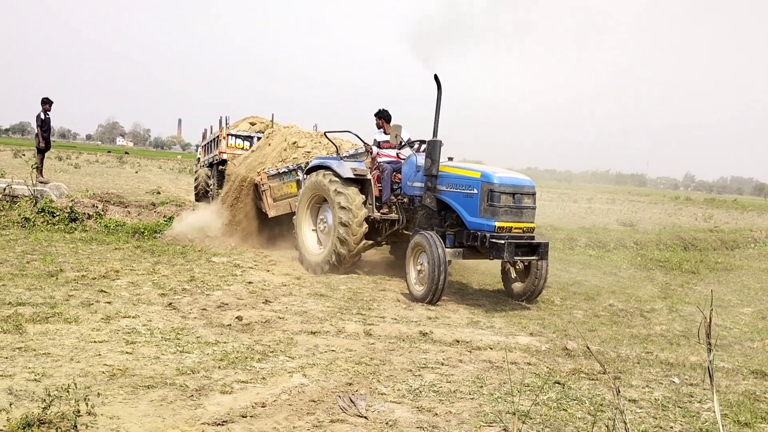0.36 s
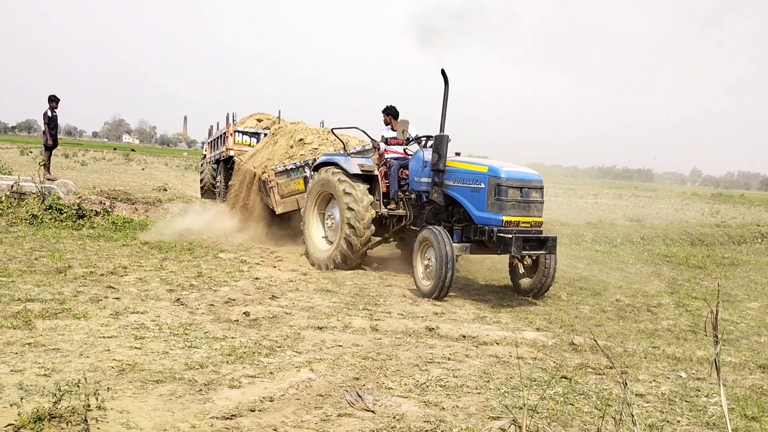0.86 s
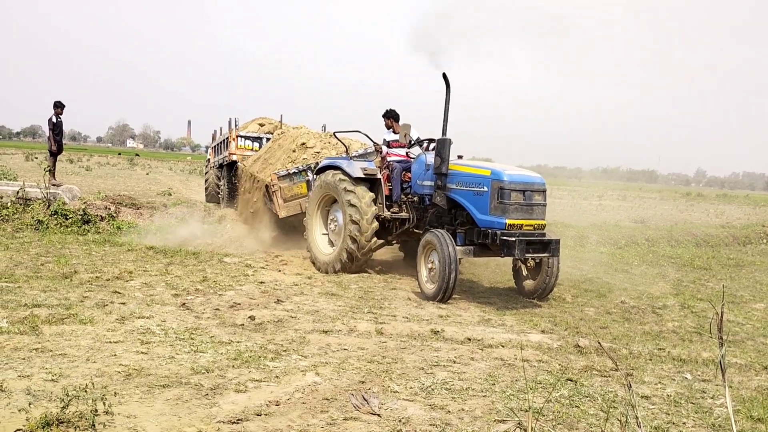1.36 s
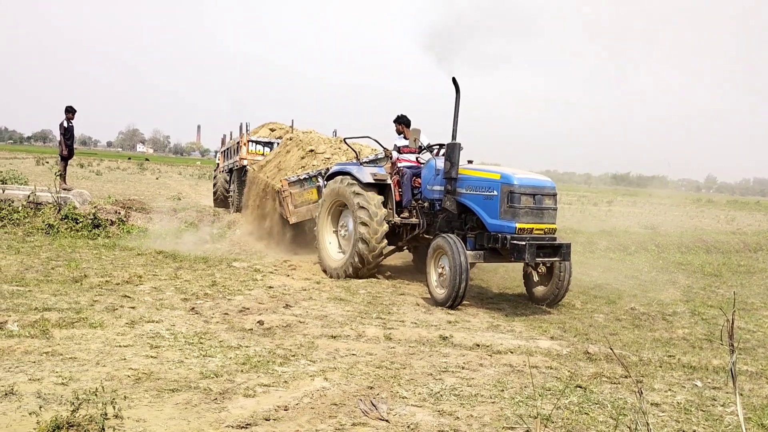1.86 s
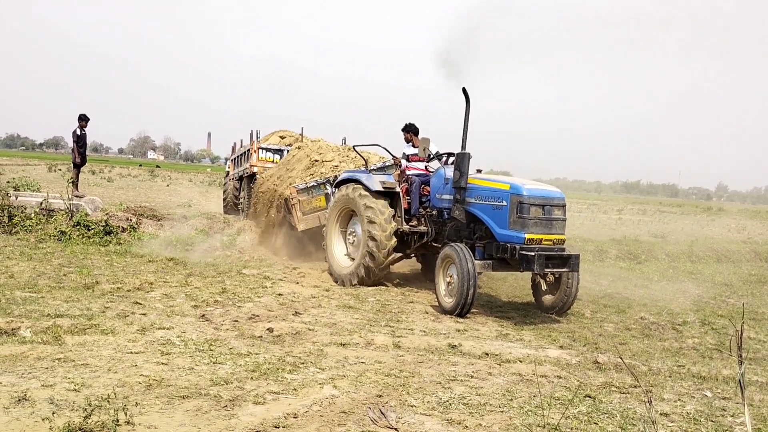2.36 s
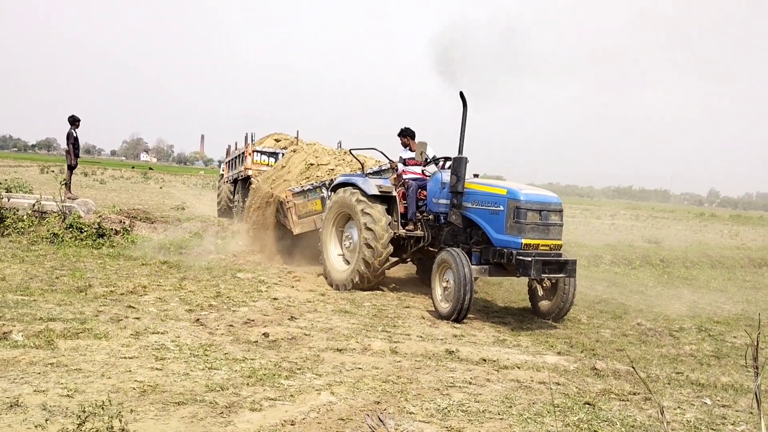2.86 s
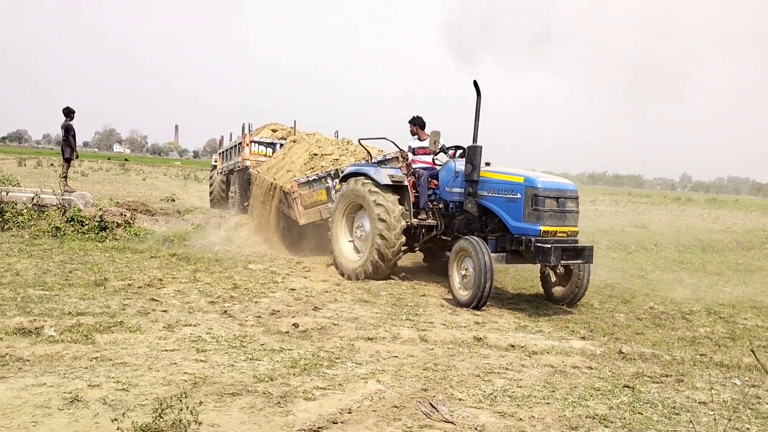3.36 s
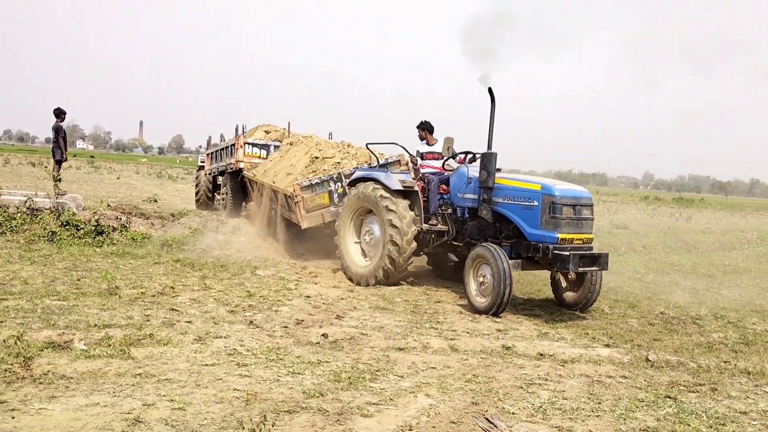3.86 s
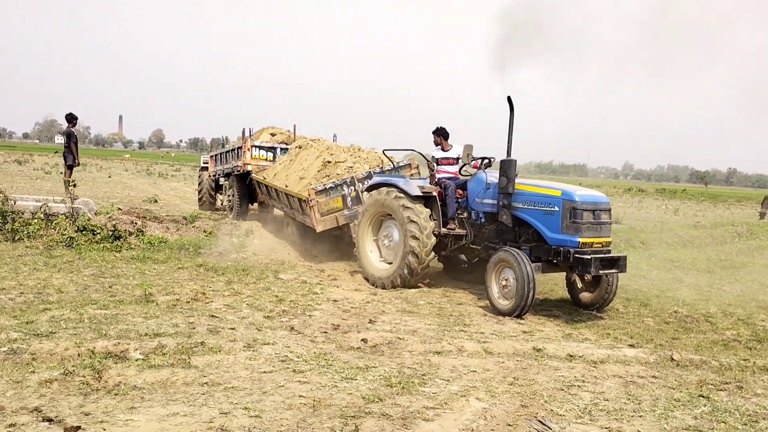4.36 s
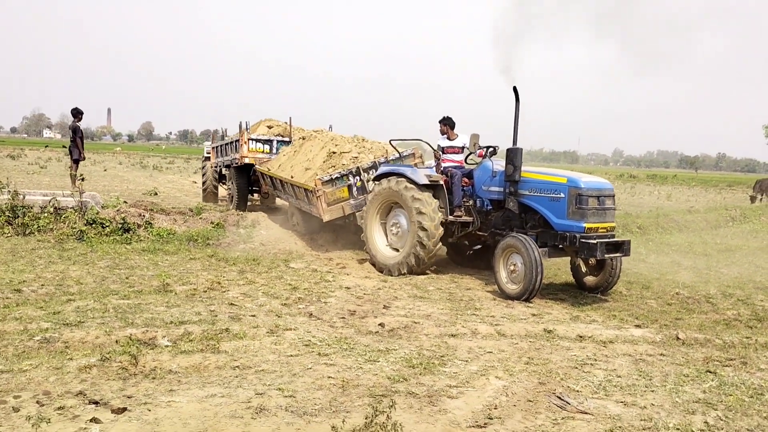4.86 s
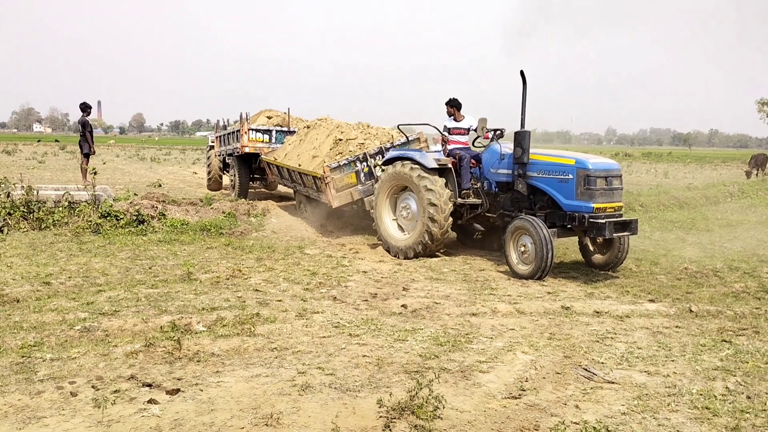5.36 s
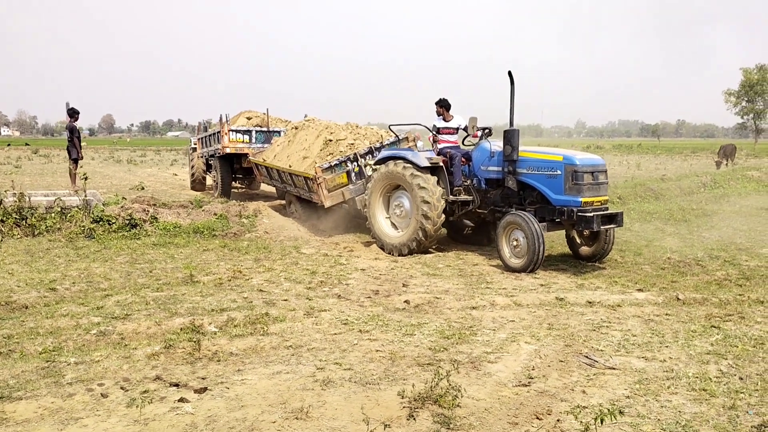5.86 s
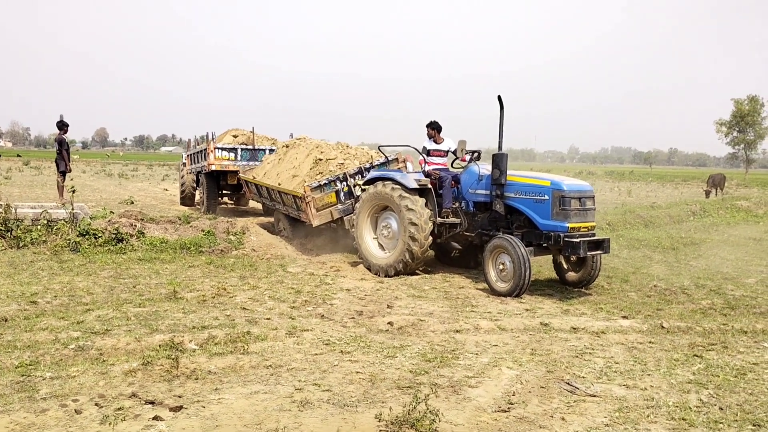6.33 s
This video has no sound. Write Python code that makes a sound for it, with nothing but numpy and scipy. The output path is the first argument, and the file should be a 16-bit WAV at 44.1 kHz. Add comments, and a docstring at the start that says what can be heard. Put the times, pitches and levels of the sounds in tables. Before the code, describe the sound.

From 0 s a three-cylinder diesel tractor is already straining at full effort, a few metres from a small phone microphone in an open field. About 45 rapid firings a second fuse into rough chugging: low exhaust thumps, a surging muffler growl, bright spitting stack hiss and hard ringing block clatter. Tyres rumble in soil and a low driveline drone wavers in spells. The pace sags after 0.8 s and again near 2 s; the trailer bed bumps at 1.7 s. Around 3 s the engine eases, quieter and more distinctly pulsed, with sheet metal ringing. From 4 to 5.2 s gears grind, with hard metallic knocks and hitch creaks, a sharp one at 4.45 s, as the pace rises slightly. At 5.3 s the throttle shuts: hiss collapses and the engine slows with faint rattle, dull low thuds and thin creaks until 6.5 s.

```python
"""A three-cylinder diesel tractor strains against a loaded trailer in a field, some metres from a phone.
From the start each firing thumps in the exhaust, growls in the muffler, spits stack hiss and rings the block;
tyres rumble, a driveline tone drones in spells and the trailer bed bumps. At 3 s the engine eases and sheet metal
rings with the knocks; from about 4 s noisy gears grind, single case modes are struck and the hitch creaks.
At 5.3 s the throttle shuts: the engine coasts down with a faint block rattle, low thuds and more creaks."""
import sys
import numpy as np
from scipy import signal
from scipy.fft import rfft, irfft, next_fast_len
from scipy.io import wavfile
from scipy.ndimage import uniform_filter1d, map_coordinates

SR = 44100
rng = np.random.default_rng(int(sys.argv[2]) if len(sys.argv) > 2 else 0)


def dump(signal):
    """Clip the signal to [-1, 1] and save it as 16-bit WAV at the path in sys.argv[1]."""
    limited = np.clip(np.atleast_2d(signal).T, -1, 1)
    pcm = np.round(limited * 32767).astype(np.int16)
    wavfile.write(sys.argv[1], SR, pcm)


def gain_from_db(level_db):
    """Turn a decibel level (scalar or array-like) into a linear amplitude factor."""
    decades = np.asarray(level_db, float) / 20
    return 10 ** decades


N = 285327
TIME = np.arange(N) / SR

# engine speed: t/s, firing rate/Hz
FIRING_RATE = [(0.0, 44.5), (0.3, 45.07), (0.8, 43.7), (1.0, 40.13), (1.5, 41.97), (1.75, 40.92),
               (2.2, 36.14), (2.5, 37.07), (2.8, 35.87), (3.95, 34.96), (4.2, 36.15), (5.05, 37.47),
               (5.3, 39.93), (5.45, 38.72), (6.1, 29.22), (6.47, 26.88)]
# per cylinder, before random scatter: hiss level/dB, ring level/dB, thump level/dB
CYLINDERS = [(0, -12.5, 5.5), (1.5, -12.5, 4.5), (2.2, -12.5, 6)]
# load on the engine, as stack hiss: t/s, level/dB
LOAD = [(0, -33.5), (1, -35), (2, -35), (2.35, -36.5), (2.98, -36), (3.2, -42.5), (3.75, -44.5), (4, -41.5),
        (4.6, -45.5), (5, -44), (5.275, -44.5), (5.3, -62), (5.85, -62), (6.1, -64.5), (6.47, -68.5)]
# stage of the pull: t/s, stage (0 straining, 1 eased, 2 throttle shut)
STAGE = [(0, 0), (2.95, 0), (3.2, 1), (5.28, 1), (5.31, 2), (6.47, 2)]
# per stage: mean hiss level/dB, ring level/dB, thump level/dB, pulsed share (0-1), top-treble hiss level/dB
STAGE_SETTINGS = [(-35, -36.5, -44, 0.73, -2), (-38, -45.5, -51, 0.88, -1), (-63.5, -51, -58.5, 0.46, 1)]
# per stage: slope of ring level against load (dB/dB)
RING_PER_LOAD = [1.77, 0.077, 0.42]
# stack hiss spectrum: f/Hz, density level/dB per Hz
STACK = [(2060, -12.5), (3500, -16), (3900, -7.5), (5350, -0.5), (6300, -9), (8280, -4.5), (8820, -7),
         (9940, -13), (12700, -11), (15100, -23), (15900, -19)]
# block and bonnet resonances, one list per stage: f/Hz, width/Hz, level/dB
BLOCK = [
    [(738, 232, -2.5), (1142, 205, 0), (1374, 170, -5.5), (1768, 270, 1.5), (2370, 320, -1.5),
     (3056, 203, -1.5), (3563, 220, -7)],
    [(826, 1610, 9.5), (1205, 300, 16), (1620, 480, 11.5), (2620, 1370, 11.5), (3320, 2740, 10.5)],
    [(473, 230, -4), (1124, 70, 1), (1350, 79, 6), (1360, 2370, -3.5), (2480, 6000, -18), (8040, 2700, -15)],
]
# exhaust pipe resonances: f/Hz, width/Hz, level/dB
PIPE = [(73.6, 12, 1.5), (114.5, 19.7, 6), (217.4, 28, -2), (289, 48, -13.5)]
# exhaust growl, 3 dB above the level used: t/s, level/dB
GROWL = [(0.0, -42), (0.21, -37.5), (0.29, -46), (0.77, -39), (1.26, -43), (1.31, -63), (1.41, -38),
         (1.66, -52), (1.75, -36.5), (2.36, -45), (2.5, -33), (2.61, -46), (2.77, -37), (3.17, -46.5),
         (4.34, -52), (5.46, -50.5), (5.78, -62.5), (6.47, -57.5)]
# muffler resonances: f/Hz, width/Hz, level/dB
MUFFLER = [(160, 71, 1), (212, 50, 2.5), (283.2, 59, -0.5), (343, 34, -11)]
# tyres and chassis: t/s, level/dB
SOIL = [(0, -48), (.8, -39.5), (1.4, -53), (1.75, -42), (2.2, -47), (3.08, -45.5), (3.3, -43.5), (4.6, -53),
        (5.28, -51), (5.35, -52.5), (5.6, -55.5), (6.47, -59.5)]
# tyre and chassis spectrum: f/Hz, density level/dB per Hz
RUMBLE = [(15, -56), (25, -62), (85, -9.5), (112, 4.5), (150, 4), (195, -3), (279, -6), (325, -11),
          (479, -16.5), (900, -11), (1170, -63), (1980, -120)]
# air on the microphone ports: f/Hz, density level/dB per Hz
BREEZE = [(15, -6), (30, -6), (60, 2), (120, -21), (300, -60)]
# driveline drone pitch, before a random waver: t/s, f/Hz
DRONE = [(0, 126), (0.549, 115.3), (.8, 111.1), (1.049, 121), (1.23, 137.2), (1.652, 113.9), (1.93, 107.5),
         (2.3, 114.4), (2.581, 109), (2.8, 103.6), (3.171, 103.6), (3.6, 105.6), (3.85, 115.6)]
# spells of drone: start t/s, end t/s, multiple of the pitch, level/dB
HUMS = [(0.01, 0.108, 1, -32.5), (0.546, 0.96, 1, -37), (1.013, 1.215, 1, -33), (1.657, 1.943, 1, -40.5),
        (2.346, 2.562, 1, -36), (2.736, 2.904, 2, -48.5), (2.967, 3.07, 1, -38.5), (3.288, 3.452, 1, -42.5),
        (3.553, 3.863, 1, -47.5)]
# trailer bumps: t/s, level/dB, decay/s
JOLTS = [(1.72, -34, 0.0071), (1.733, -38, 0.042), (5.32, -63, 0.052)]
# trailer bed resonances: f/Hz, width/Hz, level/dB
TRAILER = [(256, 150, 12), (655, 590, 9), (1250, 370, -10)]
# sheet metal modes: f/Hz, width/Hz
PANELS = [(1730, 110), (2186, 120), (2780, 190), (3030, 200), (3330, 120), (3715, 170), (4760, 650),
          (5570, 480), (8000, 1500), (1533, 100), (2050, 85), (807, 120), (1166, 95)]
# clearest panel ringing: start t/s, end t/s, row of PANELS from 0, level/dB
SPELLS = [(3.276, 3.554, 4, -55), (3.49, 3.54, 11, -52), (3.63, 3.69, 4, -47), (3.66, 3.867, 10, -56.5),
          (3.796, 3.912, 12, -52), (3.25, 3.55, 6, -51), (3.352, 3.66, 5, -54), (3.923, 4.17, 8, -51),
          (4.09, 4.37, 4, -55), (4.31, 4.433, 1, -54.5), (4.93, 5.168, 7, -47), (5.1, 5.294, 1, -52)]
# gears under strain, low then high: start t/s, end t/s, level/dB, fade/s
GRIND = [(4.09, 4.92, -46, 0.3), (4.03, 5.25, -46.5, 0.06)]
# gear case resonances, low list then high: f/Hz, width/Hz, level/dB
GEARS = [
    [(418, 150, -7), (533, 92, 2)],
    [(726, 400, -5.5), (960, 145, 11.5), (1103, 160, 10)],
]
# hardest knocks in the gear case: start t/s, level/dB, f/Hz
KNOCKS = [(4.359, -38, 530.6), (4.409, -36, 525), (4.503, -38, 537), (4.529, -36, 540.5), (4.691, -38, 530),
          (4.851, -36.5, 550), (4.056, -37, 1070), (4.139, -35.5, 1060), (4.471, -34, 1070),
          (4.553, -37.5, 1060), (4.769, -39, 1040), (4.956, -34, 1070), (4.6673, -36, 1730),
          (4.7232, -35, 1710), (4.7481, -33.5, 1710), (4.8269, -32.5, 2200)]
# hitch creaks and rings: centre t/s, level/dB, f/Hz, length/s
CREAKS = [(4.157, -41, 2200, 0.027), (4.2, -37, 2230, 0.01), (4.256, -38, 2200, 0.013),
          (4.45, -29, 2020, 0.0052), (5.438, -52, 5160, 0.023), (5.818, -58, 3430, 0.052),
          (5.9, -50, 1800, 0.05), (6.163, -54, 1900, .03), (6.3, -52, 1940, 0.037),
          (6.388, -49, 3100, 0.008), (6.4, -54, 2030, 0.052)]
# dull thuds of the coasting tractor: centre t/s, level/dB, f/Hz, length/s
THUDS = [(5.28, -43, 126, 0.043), (5.35, -44, 240, 0.049), (5.438, -47.5, 213, .05),
         (5.842, -46, 131.4, 0.088), (5.973, -52, 123, .06), (6.134, -45, 147.8, 0.019),
         (6.243, -49, 139.4, 0.028), (6.357, -43, 160, 0.027)]
# left-right likeness: f/Hz, correlation (0-1)
ALIKE = [(60, 0.92), (1200, 0.98), (2700, 0.76), (3600, 0.6), (4200, 0.13), (9000, 0.23), (15000, 0.098)]
# left over right: f/Hz, level/dB
LEFT = [(60, 0.5), (2500, 0.4), (4200, -1), (6400, 6), (9000, 11.5), (11500, -4), (15000, 5)]
# phase by which left leads right: f/Hz, phase/rad
LEAD = [(60, 0), (3600, 0.11), (4300, 1.17), (7400, 1.7), (8300, 0.044), (15000, 0)]

FIRST = .165  # part of a firing interval already run at t = 0
AHEAD = .45  # part of an interval by which exhaust pulses lead the hiss
HUM_FADE_S, OVERTONE_DB = 0.092, -15  # overtones relative to LOAD
STRAY_DB, STRAY_SWING_DB = -63, 3  # random ringing of every panel
KNOCK_RISE_S, KNOCK_CYCLES = 0.0016, 10
TOP_HZ = 15800


def unit(x):
    """Scaled to rms 1."""
    return x / np.sqrt(np.mean(x ** 2) + 1e-20)


def along(points, hz):
    """(f/Hz, value) points read on a log frequency axis."""
    f, v = np.transpose(points)
    return np.interp(np.log(hz + 1), np.log(f + 1), v)


def curve(rows):
    """(t/s, value) points interpolated at every sample."""
    t, v = np.transpose(rows)
    return np.interp(TIME, t, v)


def during(start_s, end_s, fade_s):
    """1 from start to end, fading linearly outside."""
    return np.clip(1 + np.minimum(TIME - start_s, end_s - TIME) / fade_s, 0, 1)


def wobble(rate_hz):
    """A smooth random curve with rate_hz knots a second."""
    return map_coordinates(rng.standard_normal(int(N * rate_hz / SR) + 4), [TIME * rate_hz])


def ragged(rate_hz, depth_db):
    """A gain that jumps about, breaking a noise into clatter."""
    return unit(gain_from_db(depth_db * wobble(rate_hz)))


def filtered(x, response):
    """x times a complex response of frequency."""
    m = next_fast_len(N + 8192)
    return irfft(rfft(x, m) * response(np.fft.rfftfreq(m, 1 / SR)), m)[..., :N]


def resonant(x, modes, order=1):
    """x through parallel resonances of alternating sign; order 2 darkens the valleys between them."""
    def response(f):
        total = 0
        for k, (centre, width, db) in enumerate(modes):
            peak = 1j * f * width / (centre * centre - f * f + 1j * f * width)
            total = total + (-1) ** k * gain_from_db(db) * peak ** order
        return total
    return filtered(x, response)


def patchy(x, patch_db, size, frames):
    """x with random gains over time-frequency patches (size bins by frames), the same for both rows."""
    z = signal.stft(np.pad(x, ((0, 0), (0, 512))), nperseg=256)[2]
    field = uniform_filter1d(rng.standard_normal(z.shape[1:]), size, 0)
    field = uniform_filter1d(field, frames, 1)
    return signal.istft(z * gain_from_db(patch_db * unit(field)), nperseg=256)[1][:, :N]


def firings():
    """Firing number, seconds from that firing, and firing intervals run, for every sample."""
    rate_hz = curve(FIRING_RATE)
    turns = FIRST + np.cumsum(rate_hz) / SR
    number = np.floor(turns + .3).astype(int)  # each firing's span opens 0.3 interval early
    return number, (turns - number) / rate_hz, turns


def burst(since_s, rise_s, fall_s):
    """An envelope swelling up to each event and dying after it (time constants)."""
    return np.where(since_s < 0, np.exp(-(since_s / rise_s) ** 2), np.exp(-since_s / fall_s))


def echoing(number, since_s, share):
    """Two noises in which each firing partly repeats the waveform of its neighbours."""
    shapes = rng.standard_normal((2, number[-1] + 1, 2048))
    shapes = unit(uniform_filter1d(shapes, size=5, axis=1))
    repeated = shapes[:, number, np.round(since_s * SR).astype(int) % 2048]
    share = np.clip(share, 0, 1)
    return np.sqrt(share) * repeated + np.sqrt(1 - share) * rng.standard_normal((2, N))


def stack_flow(number, since_s, size_db, pulsed):
    """Gas spits from the stack for a few ms over a thin steady flow; returns turbulence and spit envelope."""
    # some strokes are sharp, some drawn out
    slack = np.exp(.15 * rng.standard_normal(number[-1] + 1))[number]
    first = burst(since_s / slack, 0.0032, 0.0018)
    second = 0.62 * burst(since_s - .003, 0.0036, 0.0046)
    spit = unit(gain_from_db(size_db) * (first + second + 0.043))
    flow = (pulsed * spit + 1 - pulsed) * echoing(number, since_s, 0.31 * pulsed)
    flow = patchy(flow, patch_db=2.2, size=2, frames=30)
    # each spit has its own colour
    return patchy(flow, patch_db=1.4, size=9, frames=7), spit


def stack_hiss(flow, edge_db):
    """Turbulence coloured by the stack, with a gain of edge_db above about 9.5 kHz."""
    hiss = unit(filtered(flow, lambda hz: gain_from_db(along(STACK, hz))))
    top = filtered(hiss, lambda hz: 1 / (1 + (9500 / (hz + 1)) ** 12))
    return hiss + (gain_from_db(edge_db) - 1) * top


def combustion_blows(number, since_s, size_db, pulsed):
    """Combustion knock, with a duller tick of the valve gear ahead of it."""
    knock = burst(since_s - .001, 0.0013, 0.0047)
    blows = pulsed * unit(gain_from_db(size_db) * (knock + 0.55)) + 1 - pulsed
    blows = blows * echoing(number, since_s, 0.49 * pulsed)
    tick = pulsed * burst(since_s + 0.0061, 0.0016, 0.0017) * echoing(number, since_s, 0.19)
    return blows + 2.35 * filtered(tick, lambda hz: 1 / (1 + (hz / 1400) ** 6))


def block_ring(blows, pulsed, stage):
    """Blows and, more when coasting, a faint rush and rattle excite the block modes of each stage."""
    struck = patchy(blows * ragged(250, depth_db=2.3), patch_db=2.8, size=1, frames=9)
    rattle = ragged(120, depth_db=2.3) * rng.standard_normal((2, N))
    rattle = patchy(rattle, patch_db=4.0, size=1, frames=8)
    shake = pulsed * unit(struck) + (1 - pulsed) * unit(rattle)
    ring = 0
    for k, modes in enumerate(BLOCK):
        share = np.sqrt(np.clip(1 - abs(stage - k), 0, 1))
        ring = ring + share * unit(resonant(shake, modes, order=2))
    return ring


def exhaust_thump(turns, size_db, stage):
    """One pressure pulse a firing, uneven once the throttle is shut, rings the pipe."""
    uneven = 0.069 * np.clip(stage - 1, 0, 1) * wobble(29)
    pulses = np.diff(np.floor(turns + AHEAD + uneven), prepend=0) * gain_from_db(size_db)
    # the microphone loses the fundamental
    return unit(filtered(resonant(pulses, PIPE),
                         lambda hz: (1j * hz / 70 / (1 + 1j * hz / 70)) ** 4 / (1 + 1j * hz / 350)))


def engine():
    """Firings drive stack hiss, block ring and panels (two channels) and the exhaust thump (one)."""
    number, since_s, turns = firings()
    load_db, stage = curve(LOAD), curve(STAGE)

    def staged(values):
        return np.interp(stage, np.arange(3), values)

    mean_db, ring_db, thump_db, pulsed, edge_db = map(staged, np.transpose(STAGE_SETTINGS))
    ring_db = ring_db + staged(RING_PER_LOAD) * (load_db - mean_db)
    pulsed = np.clip(pulsed, 0, 1)
    scatter_db = rng.standard_normal((number[-1] + 1, 3)) * [1.1, 1.3, .6]
    size_db = np.array(CYLINDERS)[number % 3].T + scatter_db[number].T

    flow, spit = stack_flow(number, since_s, size_db[0], pulsed)
    blows = combustion_blows(number, since_s, size_db[1], pulsed)
    hiss = gain_from_db(load_db) * stack_hiss(flow, edge_db)
    ring = gain_from_db(ring_db) * block_ring(blows, pulsed, stage)
    drive = unit(flow * np.sqrt(spit)) + 0.57 * unit(blows)
    sheet = panels(drive, eased=np.clip(1 - abs(stage - 1), 0, 1))
    thump = gain_from_db(thump_db) * exhaust_thump(turns, size_db[2], stage)
    return hiss + ring + sheet, thump


def growl():
    """Gas pulses and turbulence in the muffler, ahead of each spit from the stack."""
    _, _, turns = firings()
    puffs = (1 + 0.57 * np.cos(2 * np.pi * (turns + 0.19))) * rng.standard_normal((2, N))
    pulses = np.diff(np.floor(turns + AHEAD), prepend=0) * gain_from_db(.8 * wobble(30))
    mix = unit(resonant(pulses, MUFFLER, order=2)) * [[1], [0]]  # pulses in the first row only
    mix = mix + .55 * unit(resonant(puffs, MUFFLER, order=2))
    return gain_from_db(curve(GROWL) - 3.0) * unit(mix)


def tyres():
    """Low rumble of lugs churning the soil: wavering noise with a fixed spectrum."""
    churn = gain_from_db(1.2 * wobble(10)) * rng.standard_normal((2, N))
    return gain_from_db(curve(SOIL)) * unit(filtered(churn, lambda hz: gain_from_db(along(RUMBLE, hz))))


def breeze():
    """A faint low stir of air, dying down by 2 dB/s, a little different at each port."""
    air = rng.standard_normal(N) + 0.33 * rng.standard_normal((2, N))
    level_db = -69.0 - 2.0 * TIME + 4.1 * wobble(2.83)
    return gain_from_db(level_db) * unit(filtered(air, lambda hz: gain_from_db(along(BREEZE, hz))))


def drone():
    """A wavering low drone and overtones, from 2 s close to three times the firing rate;
    the overtone level follows the load."""
    phase = 2 * np.pi * np.cumsum(curve(DRONE) + wobble(15)) / SR

    def level(multiple):
        return sum(gain_from_db(db) * during(start, end, HUM_FADE_S) ** 2
                   for start, end, k, db in HUMS if round(k) == multiple)

    octave = level(2) + gain_from_db(curve(LOAD) + OVERTONE_DB) * during(0, DRONE[-1][0], HUM_FADE_S)
    low = level(1) * gain_from_db(2.2 * wobble(18)) * np.sin(phase)
    high = np.sin(2 * phase) + gain_from_db(-17.5) * np.sin(3 * phase)
    return np.sqrt(2) * (low + octave * gain_from_db(2.0 * wobble(9)) * high)


def trailer():
    """Bumps: noise bursts through the dull resonances of the trailer bed."""
    blows = np.zeros(N)
    for t, db, decay_s in JOLTS:
        blows += gain_from_db(db) * burst(TIME - t, 0.011, decay_s)
    return blows * unit(resonant(rng.standard_normal(N), TRAILER, order=2))


def panels(drive, eased):
    """Sheet metal ringing in spells with the knocks, and at random while the engine is eased."""
    levels = [eased * gain_from_db(STRAY_DB + STRAY_SWING_DB * wobble(7)) for _ in PANELS]
    for start, end, number, db in SPELLS:
        levels[round(number)] = levels[round(number)] + gain_from_db(db) * during(start, end, 0.013)
    total = 0
    for level, (hz, width) in zip(levels, PANELS):
        ring = unit(resonant(drive, [(hz, width, 0)], order=2))
        total = total + level * gain_from_db(1.7 * wobble(25.02)) * ring
    return total


def gears():
    """Tooth contacts rattling the gear case, hardest as each firing loads the shaft."""
    _, since_s, _ = firings()
    low = burst(since_s + 0.0026, 0.0047, 0.0059) + 0.83
    high = burst(since_s + 0.0078, 0.0012, 0.0018) + 0.37 * burst(since_s - .002, 0.0012, 0.0059) + 0.93
    total = 0
    for (start, end, db, fade), stroke, modes in zip(GRIND, (low, high), GEARS):
        teeth = stroke * ragged(60, depth_db=2.5) * rng.standard_normal((2, N))
        level = gain_from_db(db + 1.7 * wobble(4.06)) * during(start, end, fade)
        total = total + level * unit(resonant(teeth, modes, order=2))
    return total


def knocks():
    """Single blows, each swelling, then dying over KNOCK_CYCLES in one mode of the gear case."""
    total = np.zeros(N)
    for t, db, hz in KNOCKS:
        swell = burst(TIME - t - KNOCK_RISE_S, KNOCK_RISE_S, KNOCK_CYCLES / hz)
        total += gain_from_db(db) * swell * np.sin(2 * np.pi * hz * TIME + wobble(60))
    return total


def short_rings(rows):
    """Narrow tones with ragged bell-shaped envelopes and wandering phase."""
    total = np.zeros(N)
    for t, db, hz, length_s in rows:
        swell = np.exp(-(2 * (TIME - t) / length_s) ** 2) * ragged(hz / 15, depth_db=2.5)
        total += gain_from_db(db) * swell * np.sin(2 * np.pi * hz * TIME + wobble(hz / 12))
    return total


def hitch():
    """Creaks: short narrow rings of the coupling."""
    return short_rings(CREAKS)


def coasting_thuds():
    """Dull thuds of the coasting tractor: short low rings."""
    return short_rings(THUDS)


def ports(pair):
    """Two microphone ports: alike in the bass, apart in level and phase in the treble."""
    def spread(hz):
        turn = np.arccos(np.clip(along(ALIKE, hz), -1, 1)) / 2
        return np.array([np.cos(turn), np.sin(turn)])

    def lean(hz):
        left = gain_from_db(along(LEFT, hz) / 2) * np.exp(.5j * along(LEAD, hz))
        return np.array([left, 1 / left])

    mid, side = filtered(pair, spread)
    return filtered(np.array([mid + side, mid - side]), lean)


def scene():
    """The tractor and its trailer as the two ports hear them."""
    noisy, thump = engine()
    wide = ports(noisy + growl() + tyres() + gears())
    single = thump + drone() + trailer() + knocks() + hitch() + coasting_thuds()
    return wide + single * gain_from_db([[.2], [-.2]])


def roll_off(x):
    """The treble ends steeply here."""
    return signal.sosfilt(signal.butter(12, 16030, fs=SR, output="sos"), x)


def record(dry):
    """The small microphone loses deep bass and catches the breeze; the tractor's sound ends at TOP_HZ."""
    heard = filtered(dry, lambda hz: (1j * hz / 55 / (1 + 1j * hz / 55)) ** 2 * (hz < TOP_HZ))
    mix = heard + breeze()
    return roll_off(mix)


dry = scene()
out = record(dry)
dump(out)
```